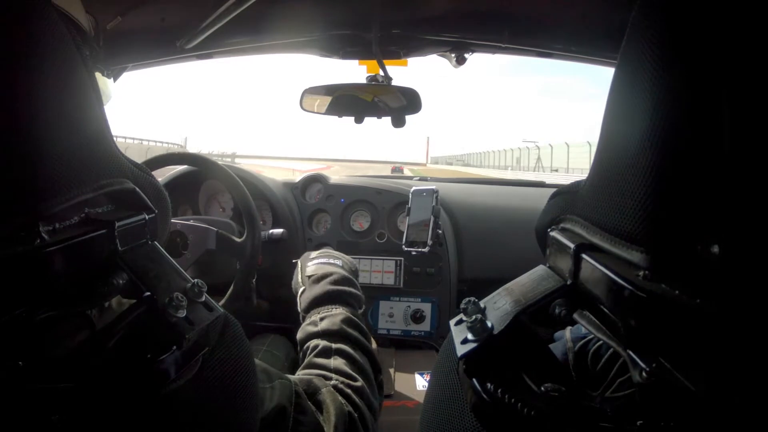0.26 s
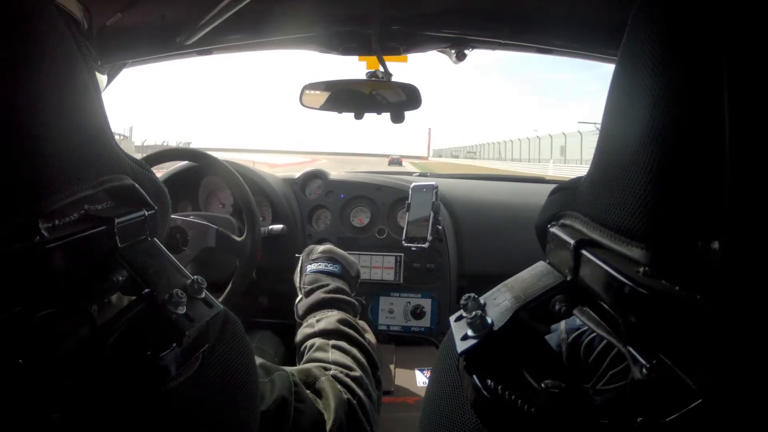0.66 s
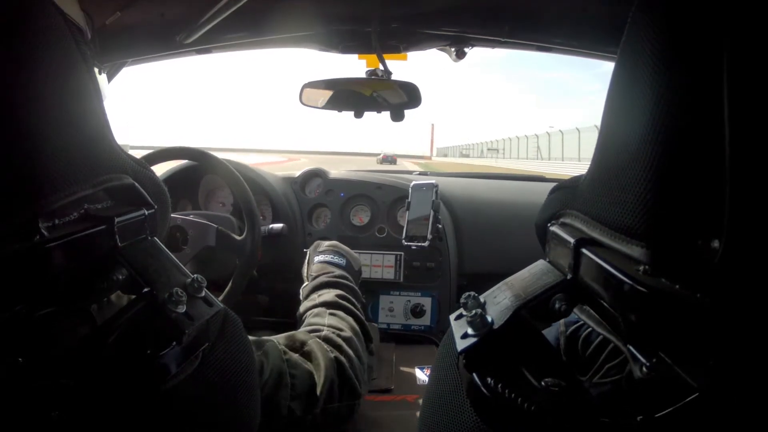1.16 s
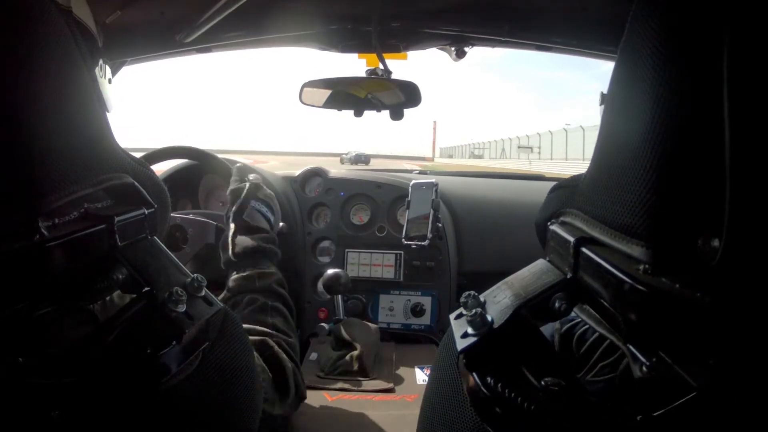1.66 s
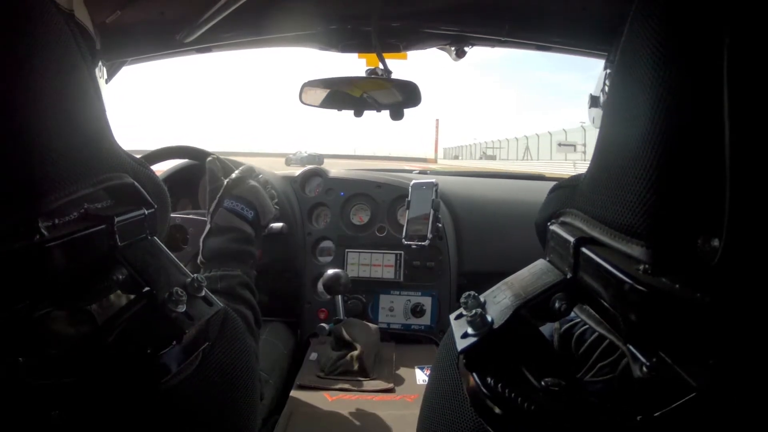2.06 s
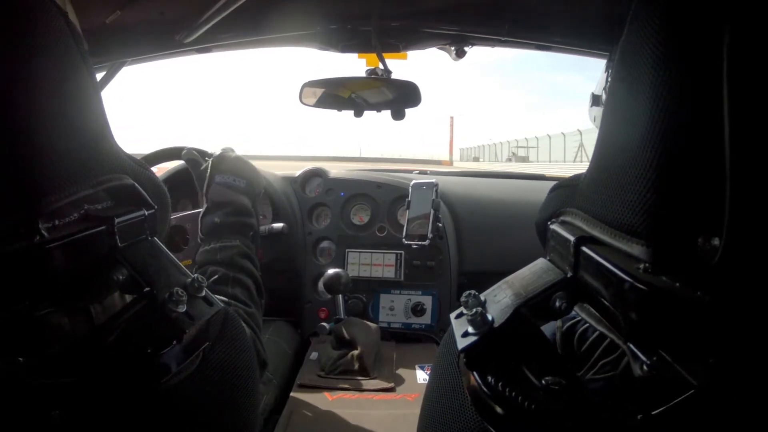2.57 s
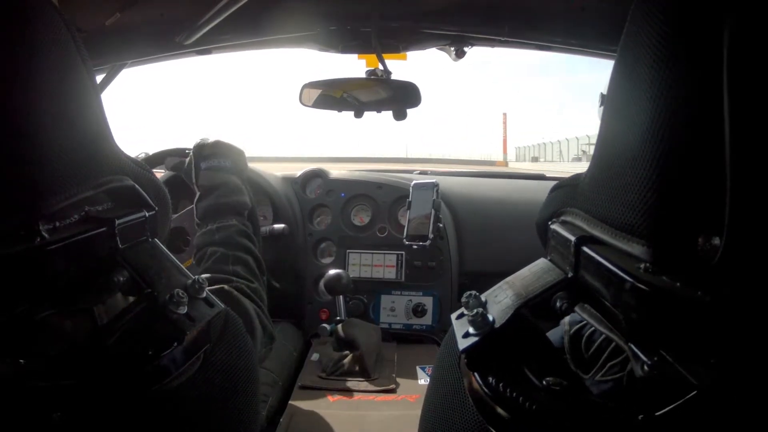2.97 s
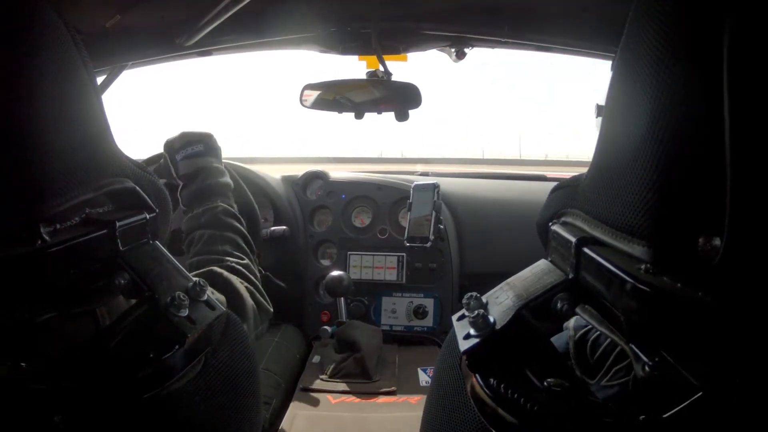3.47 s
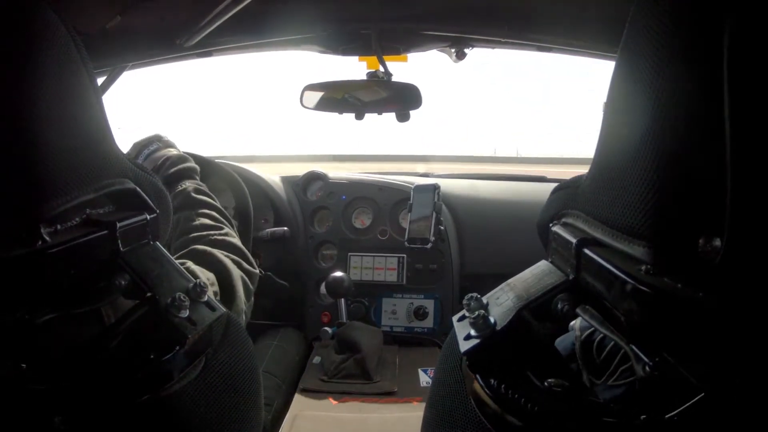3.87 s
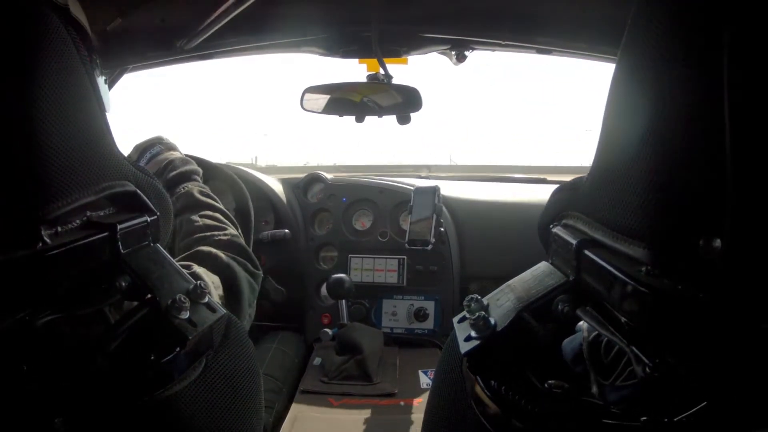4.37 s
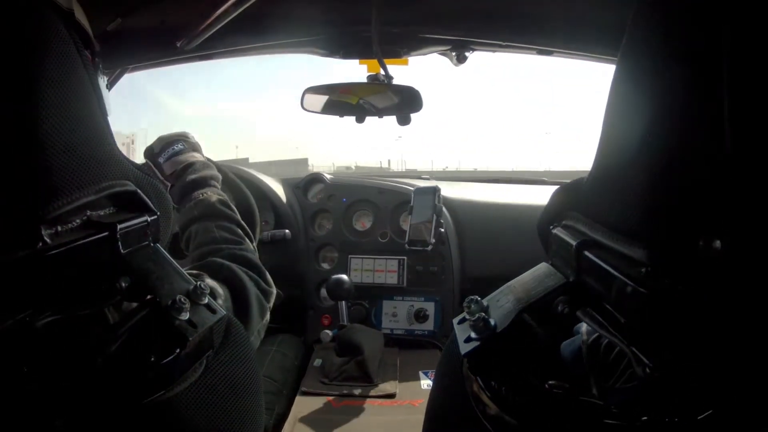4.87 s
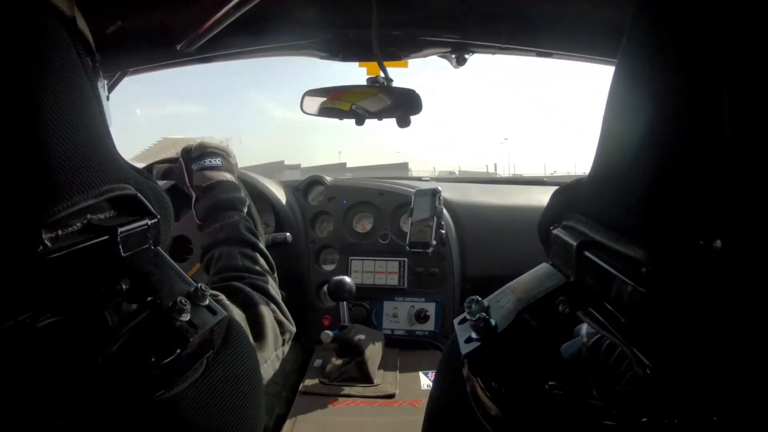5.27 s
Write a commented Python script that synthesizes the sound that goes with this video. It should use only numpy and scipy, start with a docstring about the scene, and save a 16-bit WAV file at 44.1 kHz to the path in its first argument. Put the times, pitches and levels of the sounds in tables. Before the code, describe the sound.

In a stripped race car cabin on a track, a loud booming engine drops from full throttle to a burbling overrun as the car brakes. Around 1.4 seconds a short bark lifts the revs for a downshift, then the note sinks steadily. Stones crack under the car before power returns with a growl and a low kerb rumble. The microphone is fixed inside; tyre and wind roar surround it.

```python
"""The cabin of a V10 race car that lifts off, brakes, blips down a gear, coasts and pulls away over a kerb.
Tyres, road and wind are shaped noise; grit cracks on the wheel arches and the brakes whistle faintly as sines.
Throttle and crank angle drive the intake rasp, the exhaust burble and the panel drones.
The side exhaust booms at the firing rate of one cylinder bank; uneven cylinders growl between its harmonics."""
import sys
import numpy as np
from scipy import signal
from scipy.fft import rfft, irfft
from scipy.io import wavfile
from scipy.ndimage import uniform_filter1d

SR = 44100
rng = np.random.default_rng(int(sys.argv[2]) if len(sys.argv) > 2 else 0)


def pcm_store(signal):
    """Save signal as 16-bit PCM."""
    levels = np.round(np.clip(np.atleast_2d(signal), -1, 1) * 32767)
    wavfile.write(sys.argv[1], SR, levels.astype(np.int16).T)


N = 243873
TIME_S = np.arange(N) / SR
BINS_HZ = np.fft.rfftfreq(N, 1 / SR)

# Firing rate of one bank: time [s], firing_rate [Hz]
FIRING_RATE = [(0, 175.1), (.19, 174.2), (.39, 177.4), (.5, 171), (.62, 172.6), (.78, 169.5), (1.14, 130.7),
               (1.28, 124.8), (1.42, 146.2), (1.575, 187.4), (1.75, 170.8), (1.9, 166.3), (2.3, 148.3),
               (2.74, 125), (3, 115.2), (3.33, 105.8), (4.05, 100.5), (4.18, 101.6), (4.3, 105.1),
               (4.85, 109.3), (5.2, 115.8), (5.53, 120)]
# Throttle opening: time [s], opening [0-1]
THROTTLE = [(0, 0.97), (.27, 0.75), (.42, 0), (1.28, 0), (1.38, 0.62), (1.47, 0.52), (1.56, 0.13),
            (4.1, 0.01), (4.25, 0.87), (5.53, 0.95)]
# Road noise, quieter as the car slows: time [s], relative_roar [dB], relative_hiss [dB]
ROAD_LEVELS = [(0, -32, -49), (.25, -36.5, -51.5), (.42, -34.5, -58), (.55, -33.5, -51.5), (.8, -36.5, -56),
               (1.3, -38.5, -57.5), (1.9, -40.5, -59.5), (2.4, -44.5, -56), (3.05, -46, -64),
               (4.1, -45.5, -64.5), (4.75, -43, -67.5), (5.1, -37.5, -55), (5.53, -39, -58.5)]

# Tyre hum through the floor: frequency [Hz], relative_density [dB per Hz]
TYRE_HUM = [(30, -30), (65, -4.5), (100, 0), (160, 3), (220, -5), (320, -9), (600, -39), (1200, -70.5)]
# Body shake: frequency [Hz], relative_density [dB per Hz]
BODY_RUMBLE = [(10, -28), (24, -5), (44, 3.5), (60, -9), (90, -5), (150, -22.5), (220, -25), (400, -55),
               (1000, -84)]
# Jolts from the road: time [s], half_length [s], lift [dB]
ROAD_BUMPS = [(.83, .07, 4), (1.28, .08, 4), (1.63, .04, 11), (2.14, .06, 4)]
# A tyre drums over the kerb, one row: start [s], length [s], pitch [Hz]
KERB = (4.79, .52, 56)
# Tyre and wind roar: frequency [Hz], relative_density [dB per Hz]
ROAR_SPECTRUM = [(60, -6.5), (170, 11), (260, -6), (370, 7.5), (470, -7), (700, 6), (1050, -0.5), (1300, 2),
                 (1650, -0.5), (2100, -6.5), (2700, -10.5), (4200, -23), (6500, -31.5), (14000, -63.5)]
# Tyre and wind hiss: frequency [Hz], relative_density [dB per Hz]
HISS_SPECTRUM = [(400, -13), (1500, 6.5), (3000, 4), (4400, 4), (5600, -1.5), (8000, -4.5), (10200, -6),
                 (12000, -13), (14000, -19.5), (16000, -24.5)]
# Left-right likeness of noise: frequency [Hz], likeness [0-1]
STEREO_LIKENESS = [(20, .88), (150, 0.82), (400, 0.65), (1000, 0.85), (2000, 0.65), (4000, 0.39),
                   (9000, .2), (13000, 0.25)]

# Grit hits: time [s], relative_strength [dB], brightness [dB per octave], struck_spot_pitch [Hz]
GRIT_HITS = [(0.8683, -29, 2, 1600), (0.9489, -28.5, -1.5, 1595), (3.1381, -67.5, 11.5, 4000),
             (3.2131, -47, 6.5, 2500), (3.3556, -40, 4, 2500), (3.4231, -34, 3, 900),
             (3.4399, -29, -6, 1400), (3.481, -28, -.5, 1500), (3.8004, -28, -4, 1600),
             (3.886, -36, 3.5, 3000), (3.9727, -53, 8, 1100), (3.998, -25.5, -4, 1099),
             (4.011, -33, -13, 1601), (4.026, -41.5, -12, 1200), (4.0678, -57, 7, 1500),
             (4.15, -53, 6, 7000), (4.172, -27, -3, 1570), (4.211, -38, 3.5, 7500), (4.329, -24, -3, 2520),
             (4.8989, -32, 1.5, 1500), (5.0145, -26.5, -2, 1100), (5.122, -28, -1, 1655),
             (5.1633, -33, -1, 2500), (5.1772, -28, -2, 1000), (5.2766, -31, 2.5, 1700)]
# Colour of one hit: frequency [Hz], relative_level [dB]
STONE_COLOUR = [(100, -5), (400, 14), (800, 13.5), (1150, 11), (1600, 8.5), (2500, 7), (4200, 0),
                (7000, -8.5), (11000, -11), (15500, -30)]
# Wheel-arch modes: frequency [Hz], width [Hz], lift [dB]
ARCH_MODES = [(665, 220, 0.5), (1040, 81, 6), (1455, 220, 5.5), (1665, 100, 5), (1737, 136, 8),
              (2470, 160, 3), (4060, 1600, 4), (4740, 260, 1.5)]
# Ring of arch and cabin: frequency [Hz], t60 [s]
ARCH_RING = [(300, 0.27), (1500, 0.14), (4000, 0.14), (9000, 0.11), (15000, 0.05)]
# Brake whistles: start [s], length [s], pitch [Hz], relative_level [dB]
BRAKE_WHISTLES = [(.93, .36, 9480, -70), (1.26, .14, 10664, -62), (1.38, .14, 9480, -72),
                  (2.1, .42, 9480, -69), (2.46, .3, 9480, -65)]

# Rasp and whistle of the open throttle: frequency [Hz], relative_density [dB per Hz]
INTAKE_SPECTRUM = [(100, -37.5), (600, -15.5), (1500, 8), (2500, 7.5), (3500, -11), (5500, -14), (8500, -8),
                   (11000, -17), (15000, -36)]
# Panels droning as an order passes: firing_rate_multiple, panel [Hz], width [Hz], shut [dB], open [dB]
PANEL_DRONES = [(1.6, 169, 5.4, -50.5, -25), (7, 736, 29, -49, -24.5), (6, 1050, 26, -48.5, -30.5),
                (7, 1100, 58, -41, -29), (9, 1030, 92, -48.5, -35), (5, 872, 44, -50.5, -34),
                (5, 740, 220, -41, -40.5), (5, 581, 44, -48, -34), (4, 740, 70, -33.5, -36),
                (4, 642, 110, -38.5, -36)]
# Pipe on the overrun: frequency [Hz], relative_density [dB per Hz]
BURBLE_SPECTRUM = [(100, -61.5), (400, -31.5), (590, -2.5), (720, 3), (850, -9.5), (1100, -11),
                   (1600, -35.5), (6000, -93.5)]
# Exhaust spits as the throttle snaps shut: time [s], half_length [s], lift [dB]
EXHAUST_SPITS = [(.39, 0.026, 6), (1.54, 0.031, 17)]
# Engine barks on the downshift blip: time [s], half_length [s], lift [dB]
BLIP_BARKS = [(1.43, 0.042, 4.5)]

# Exhaust and body colour on the growl: frequency [Hz], relative_level [dB]
PIPE_COLOUR = [(35, -22), (70, -1), (105, -3.5), (135, 9.5), (165, 8.5), (210, -4), (290, 2.5), (460, -2.5),
               (600, -0.5), (900, -0.5), (1100, 0), (1400, -18.5), (2000, -30.5)]
# Panels that single out passing orders: frequency [Hz], width [Hz], lift [dB]
PANEL_MODES = [(713, 25, 4.5), (845, 20, 10), (1000, 75, 4.5)]
# Cabin standing waves at the fundamental: frequency [Hz], left_minus_right [dB], left_lead [rad]
CABIN_WAVES = [(101, -7.5, -.47), (105, -3, -.54), (117, -2.5, -1.18), (124, -2.5, -1.9), (131, -10, -2.5),
               (140, -8, -1.3), (155.5, .5, -.86), (164, -4.5, -.25), (171, -8, -.4), (186, -9.5, -1.2)]
# Boom at the firing rate, before throttle and sag: frequency [Hz], level [dB]
BOOM_RESPONSE = [(100, -26), (103, -19.5), (108, -17), (119, -15), (127, -18.5), (134, -17), (143, -13.5),
                 (155, -12), (172, -14), (186, -19.5)]
# Exhaust overtones through the body: frequency [Hz], relative_shut [dB], relative_open [dB]
OVERTONE_RESPONSE = [(200, -37, -32.5), (234.6, -30.5, -24.5), (242, -39, -29), (250.4, -27.5, -28.5),
                     (266, -44, -24), (276.5, -33.5, -27.5), (324, -30, -21), (331, -32, -15),
                     (355.5, -40, -21.5), (366, -34, -30), (408, -27, -32.5), (467, -33.5, -27.5),
                     (534, -36.5, -32)]
# Lead of the left side by overtone: harmonic_number: lead [rad]
OVERTONE_LEAD = {2: -0.42, 3: 0.45}
# Boom sags as the load comes off: time [s], half_length [s], change [dB]
LOAD_SAGS = [(.4, 0.013, -4), (1.27, 0.077, -7), (3.94, 0.14, -3.5)]


def amp(db):
    """Decibels to gain."""
    return 10 ** (np.asarray(db) / 20)


def unit(x):
    """Scale to rms 1."""
    return x / np.sqrt(np.mean(x ** 2) + 1e-20)


def curves(rows):
    """Each column of a time table at every sample."""
    time_s, *columns = np.transpose(rows)
    return [np.interp(TIME_S, time_s, column) for column in columns]


def read(points, hz, column=1):
    """One column of a frequency table, interpolated on a log axis."""
    table = np.transpose(points)
    return np.interp(np.log(hz + 1), np.log(table[0] + 1), table[column])


def peaks(modes, hz):
    """Lift in dB from a set of resonances."""
    return sum(db / (1 + (2 * (hz - mode_hz) / width_hz) ** 2) for mode_hz, width_hz, db in modes)


def pan(left_minus_right_db):
    """Channel gains for a level difference, averaging 1."""
    gains = amp(np.array([[left_minus_right_db], [-left_minus_right_db]]) / 2)
    return gains / gains.mean()


def swells(rows):
    """Bell-shaped changes of level, in dB at every sample."""
    return sum(db * np.exp(-((TIME_S - s) / half_s) ** 2) for s, half_s, db in rows)


def drift(knots_per_s, count=1):
    """Random wandering of rms 1, linear between knots."""
    knots = rng.standard_normal((count, 4096))
    return np.array([unit(np.interp(TIME_S * knots_per_s, np.arange(len(k)), k)) for k in knots])


def alike_spectra(size, bins_hz):
    """Two white spectra that share as much as the likeness table says."""
    a, b = rfft(rng.standard_normal((2, size)))
    same = read(STEREO_LIKENESS, bins_hz)
    return np.array([a, same * a + np.sqrt(1 - same ** 2) * b])


def noise(spectrum, right_late_s=1.5e-5):
    """Coloured stereo noise, alike in the bass and diffuse in the treble; the mid has rms 1."""
    pair = alike_spectra(N, BINS_HZ)
    pair[1] *= np.exp(-2j * np.pi * BINS_HZ * right_late_s)
    pair = irfft(pair * amp(read(spectrum, BINS_HZ)), N)
    return pair / np.std(pair.mean(0))


def pedal():
    """Throttle opening at every sample."""
    return np.clip(curves(THROTTLE)[0], 0, 1)


def tyres(level_db=-34.5):
    """Steady low hum of the tyres through the floor, as shaped noise."""
    return pan(-3.8) * amp(level_db) * noise(TYRE_HUM)


def rumble(road_db, gain_db=-29.0, road_share=0.55, power_db=-2.5, kerb_db=5.5, uneven_db=1.0,
           waver_hz=2.07, drum_share=0.75):
    """The body shakes with road and bumps, less under power; the kerb gathers the shake into one low note."""
    start_s, length_s, drum_hz = KERB
    kerb = np.clip(3 * np.sin(np.pi * np.clip((TIME_S - start_s) / length_s, 0, 1)), 0, 1)
    share = drum_share * kerb
    drum = np.sqrt(2) * np.sin(2 * np.pi * np.cumsum(drum_hz + waver_hz * drift(9.3)[0]) / SR)
    shake = noise(BODY_RUMBLE)
    # divide by the running level, so the rumble stays even
    shake /= np.sqrt(uniform_filter1d(shake.mean(0) ** 2, size=9000))
    db = gain_db + road_share * (road_db - road_db.mean()) + power_db * pedal()
    db = db + kerb_db * kerb + swells(ROAD_BUMPS) + uneven_db * drift(6.5)[0]
    return pan(-3.0) * amp(db) * (np.sqrt(1 - share ** 2) * shake + share * drum)


def air(road_db, hiss_db, angle, roar_gain_db=7.1, hiss_gain_db=4.0, open_roar_db=3.5, open_hiss_db=5.5,
        roar_puff=0.057, hiss_puff=0.08, lope=0.025, gust_db=0.5):
    """Tyre and wind roar and hiss, louder with open throttle, with a slight puff at each firing."""
    throttle = pedal()
    puffs = np.cos(angle) + 0.5 * np.cos(2 * angle)
    uneven = (1 + lope * np.cos(angle / 5)) * amp(gust_db * drift(40)[0])
    roar_level = amp(road_db + open_roar_db * throttle + roar_gain_db)
    hiss_level = amp(hiss_db + open_hiss_db * throttle + hiss_gain_db)
    roar = pan(-2.5) * roar_level * noise(ROAR_SPECTRUM) * (1 + roar_puff * puffs)
    hiss = pan(-0.8) * hiss_level * noise(HISS_SPECTRUM) * (1 + hiss_puff * puffs)
    return uneven * (roar + hiss)


def grit(gain_db=-0.5, spot_db=6.5, spot_width=0.41, pivot_hz=1600, rise_s=0.00037, crack=0.23,
         crack_s=0.0056, size=8192):
    """Each stone cracks against a wheel arch, whose modes and the cabin ring briefly."""
    out = np.zeros((2, N + size))
    t_s, bins_hz = np.arange(size) / SR, np.fft.rfftfreq(size, 1 / SR)
    octaves = np.log2(np.clip(bins_hz, 1000, 9000) / pivot_hz)
    attack = (1 - np.exp(-t_s / rise_s)) * (1 + crack * np.exp(-t_s / crack_s))
    for time_s, strength_db, bright_db, spot_hz in GRIT_HITS:
        modes = ARCH_MODES + [(spot_hz, spot_width * spot_hz, spot_db)]
        colour_db = read(STONE_COLOUR, bins_hz) + bright_db * octaves + peaks(modes, bins_hz)
        burst = irfft(alike_spectra(size, bins_hz) * amp(strength_db + gain_db + colour_db))
        # each band decays at its own rate
        band_hz, age_s, bands = signal.stft(burst, SR, nperseg=256)
        decay = np.exp(-np.log(1000) * age_s / read(ARCH_RING, band_hz)[:, None])
        ring = signal.istft(bands * decay, SR)[1][:, :size]
        start = round(time_s * SR)
        out[:, start:start + size] += ring * attack
    return pan(-2.2) * out[:, :N]


def brakes(gain_db=2.5, waver_hz=45):
    """Pads make the discs whistle thinly: wavering sines that swell and fade."""
    out = np.zeros((2, N))
    for start_s, length_s, pitch_hz, db in BRAKE_WHISTLES:
        press = np.sqrt(np.sin(np.pi * np.clip((TIME_S - start_s) / length_s, 0, 1)).clip(0))
        whistle_hz = pitch_hz + waver_hz * drift(200, count=2)
        out += amp(db + gain_db) * press * np.sin(2 * np.pi * np.cumsum(whistle_hz, axis=1) / SR)
    return out


def intake(angle, gain_db=-45.5, puff=0.19, bark_share=0.85):
    """Air tears past the open throttle in a puff at each firing."""
    level = amp(gain_db + bark_share * swells(BLIP_BARKS)) * pedal()
    return pan(-1.5) * level * noise(INTAKE_SPECTRUM) * (1 + puff * np.cos(angle))


def cabin(x, wet=0.25, decay_s=0.008, size=1300):
    """Glass and bare panels send back a dense spray of early echoes that ripples the treble."""
    t_s = np.arange(size) / SR
    echoes = rng.standard_normal((2, size)) * np.exp(-t_s / decay_s) * (t_s > 0.001)
    echoes = signal.sosfilt(signal.butter(2, 1800, "high", fs=SR, output="sos"), echoes)
    return x + wet * signal.oaconvolve(x, echoes / np.linalg.norm(echoes[0]), axes=1)[:, :N]


def drones(hz, angle, bark_share=0.47, side_lead_rad=0.4, waver=0.35):
    """A panel rings while an engine order lies within its resonance; throttle sets its level."""
    throttle, out = pedal(), np.zeros((2, N))
    for multiple, panel_hz, width_hz, shut_db, open_db in PANEL_DRONES:
        level = amp(shut_db + throttle * (open_db - shut_db))
        response = level / np.sqrt(1 + (2 * (multiple * hz - panel_hz) / width_hz) ** 4)
        a, b = waver * drift(25, count=2)
        turn = multiple * angle + 2 * np.pi * rng.random() + side_lead_rad * np.array([[1], [-1]])
        out += response * ((1 + a) * np.cos(turn) + b * np.sin(turn))
    return np.sqrt(2) * pan(-2.6) * amp(bark_share * swells(BLIP_BARKS)) * out


def burble(hz, angle, gain_db=-41.5, per_octave_db=6.5, puff=0.58, uneven_db=3.5):
    """With the throttle shut the pipe burbles unevenly, one puff a firing."""
    db = gain_db + per_octave_db * np.log2(hz / hz.mean()) + swells(EXHAUST_SPITS)
    level = (1 - pedal()) * amp(db + uneven_db * drift(30)[0])
    return pan(-1.3) * level * noise(BURBLE_SPECTRUM) * (1 + puff * np.cos(angle))


def effort(hz, shut_db=-35.0, open_db=-25.0, shut_per_octave_db=7.5, open_per_octave_db=4.5):
    """Growl level in dB before its gain: rises with revs, and higher under throttle."""
    throttle, octaves = pedal(), np.log2(hz / hz.mean())
    shut = (1 - throttle) * (shut_db + shut_per_octave_db * octaves)
    opened = throttle * (open_db + open_per_octave_db * octaves)
    return shut + opened + swells(BLIP_BARKS)


def growl(hz, level_db, angle, gain_db=-17.5, lope_db=-44.0, lope_shut_db=0.5, firing_open_db=3.0,
          crank_db=2.5, rough=0.85, steadying=0.74, rough_per_s=18, side_lead_rad=0.45, count=62):
    """No two cylinders fire alike, so multiples of the five-firing cycle sound and waver through the panels."""
    step, cylinders = 64, 5  # levels are computed every 64 samples
    slow_s, paths = TIME_S[::step], np.zeros((2, N), complex)
    throttle, slow_hz = pedal()[::step], hz[::step]
    ragged = rough * (1 - steadying * throttle)  # combustion is steadier under load
    lope = lope_db + lope_shut_db * (1 - throttle)
    cycle = np.exp(1j * angle / cylinders)
    wave = cycle.copy()
    for k in range(2, count + 1):
        wave = wave * cycle
        firing = k % cylinders == 0
        if firing and k // cylinders <= 3:  # boom() plays these
            continue
        line_hz = slow_hz * k / cylinders
        db = lope if k < 2 * cylinders else level_db[::step] + gain_db
        db = db + read(PIPE_COLOUR, line_hz) + peaks(PANEL_MODES, line_hz)
        db = db + firing * firing_open_db * throttle + crank_db * (k % 2 == 0)
        knots = rng.standard_normal((2, 512))
        swell, sway = (np.interp(slow_s * rough_per_s, np.arange(len(v)), v) for v in knots)
        size = amp(db) * (1 + ragged * (swell + 1j * sway)) * np.exp(2j * np.pi * rng.random())
        paths[rng.integers(2)] += np.interp(TIME_S, slow_s, size) * wave
    lead = np.exp(1j * side_lead_rad)  # each line leads on one side and lags on the other
    return pan(-3.0) * (paths * lead + paths[::-1] / lead).real


def boom(hz, angle, open_db=2.5, open_per_octave_db=-2.0, flutter=0.088, overtone_flutter=0.23,
         third_shut_db=-12.0, third_open_db=-8.0, bark_share=0.79, lean_db=-2.0, lean_per_octave_db=7.0):
    """The first three exhaust harmonics sweep through the cabin's standing waves and change with throttle."""
    throttle, octaves = pedal(), np.log2(hz / hz.mean())
    sag_db = swells(LOAD_SAGS)
    tilt_db, lead_rad = read(CABIN_WAVES, hz), read(CABIN_WAVES, hz, column=2)
    sides = np.array([[0.5], [-0.5]])
    ears = amp(sides * tilt_db) * np.exp(1j * sides * lead_rad)
    ears /= abs(ears.mean(0))
    db = read(BOOM_RESPONSE, hz) + throttle * (open_db + open_per_octave_db * octaves) + sag_db
    out = amp(db) * (1 + flutter * drift(45)[0]) * (ears * np.exp(1j * angle)).real
    lean = amp(sides * (lean_db + lean_per_octave_db * octaves))  # overtones move left as revs rise
    third_db = (1 - throttle) * third_shut_db + throttle * third_open_db
    for k in (2, 3):
        shut_db, overtone_open_db = (read(OVERTONE_RESPONSE, k * hz, column) for column in (1, 2))
        db = (1 - throttle) * shut_db + throttle * overtone_open_db
        db = db + (k == 3) * third_db + sag_db + bark_share * swells(BLIP_BARKS)
        a, b = overtone_flutter * drift(35, count=2)
        turn = k * angle + OVERTONE_LEAD[k] * sides
        out += lean * amp(db) * ((1 + a) * np.cos(turn) + b * np.sin(turn))
    return np.sqrt(2) * out


def scene():
    """One firing angle and one throttle drive all the engine's layers."""
    hz, = curves(FIRING_RATE)
    road_db, hiss_db = curves(ROAD_LEVELS)
    angle = 2 * np.pi * np.cumsum(hz) / SR
    background = tyres() + rumble(road_db)
    bright = cabin(air(road_db, hiss_db, angle) + grit() + intake(angle))
    engine = drones(hz, angle) + burble(hz, angle) + growl(hz, effort(hz), angle) + boom(hz, angle)
    return background + bright + brakes() + engine


def record(dry, edge_hz=15800):
    """Band limit by a linear-phase low-pass, with soft ends."""
    soft = dry * signal.windows.tukey(N, 0.0015)
    lowpass = signal.firwin(511, edge_hz, window=("kaiser", 9), fs=SR)
    return signal.oaconvolve(soft, lowpass[None], "same")


dry = scene()
out = record(dry)
pcm_store(out)
```